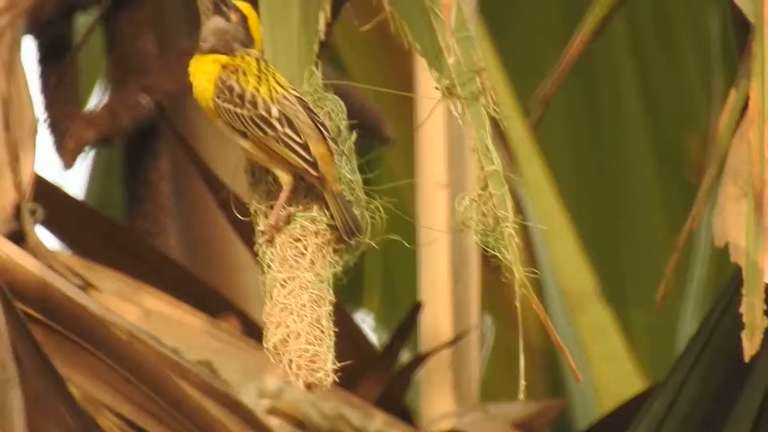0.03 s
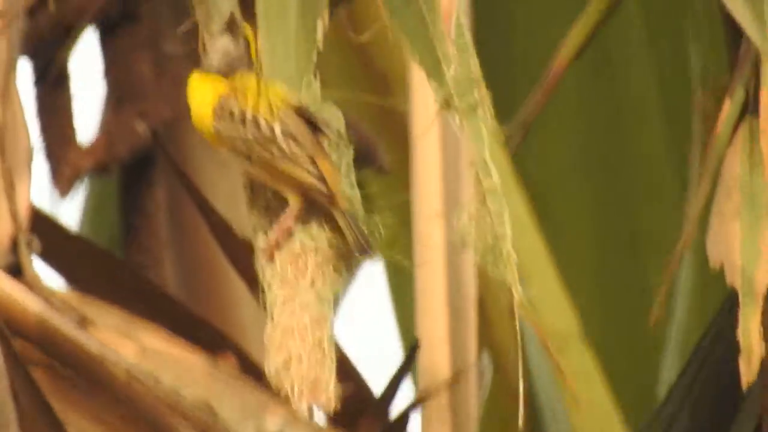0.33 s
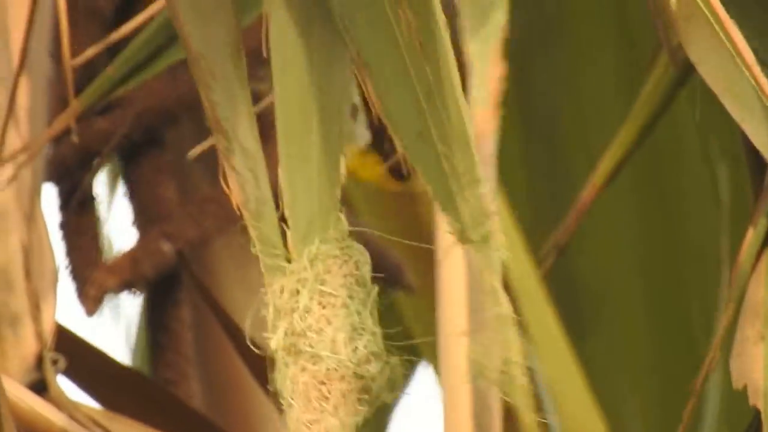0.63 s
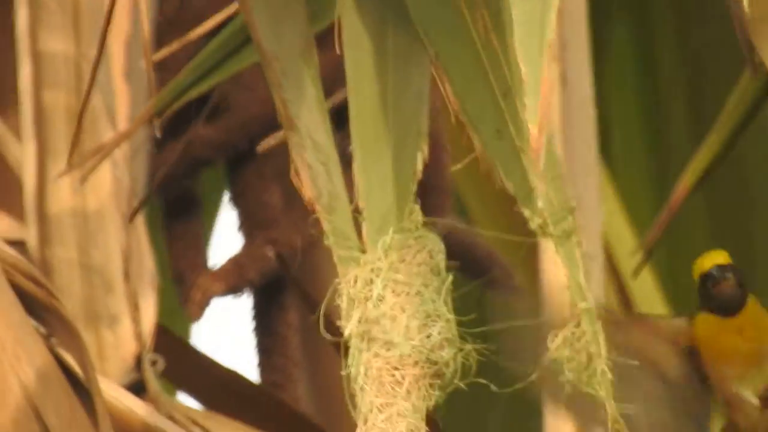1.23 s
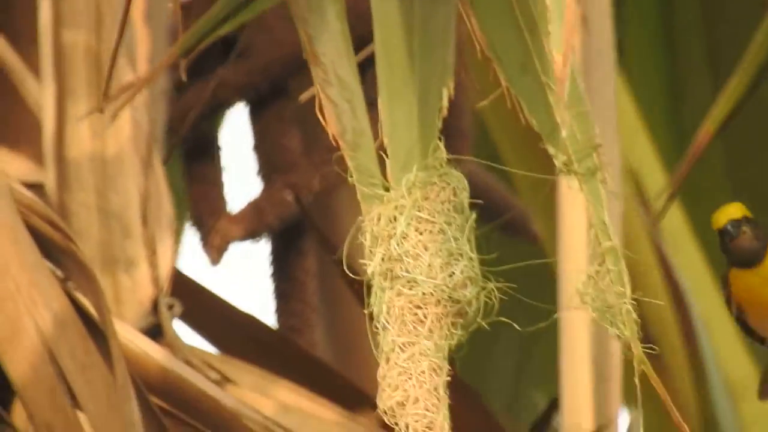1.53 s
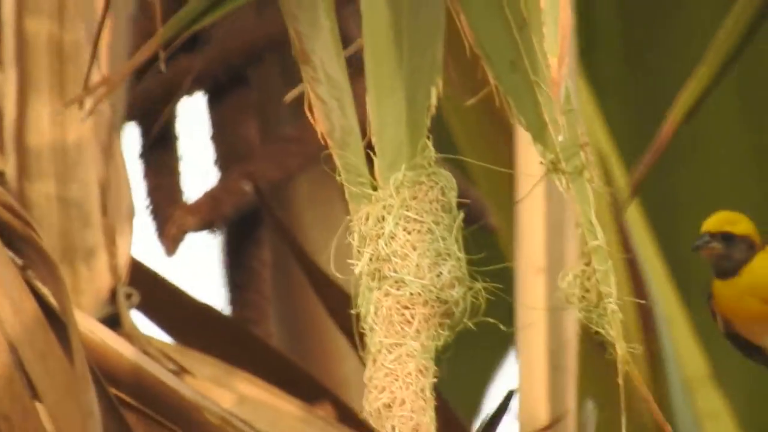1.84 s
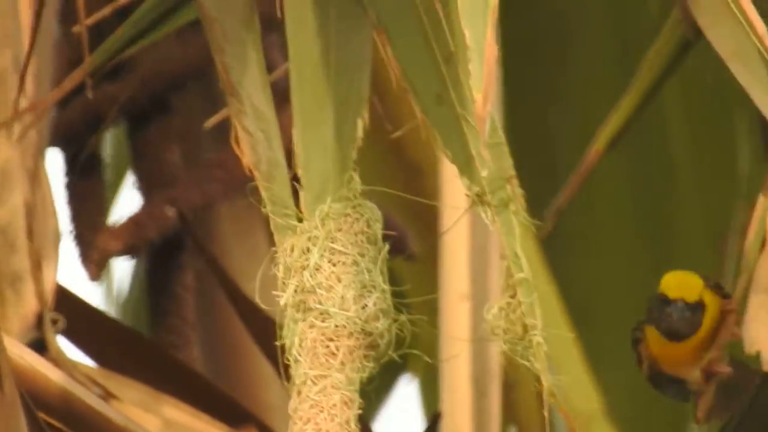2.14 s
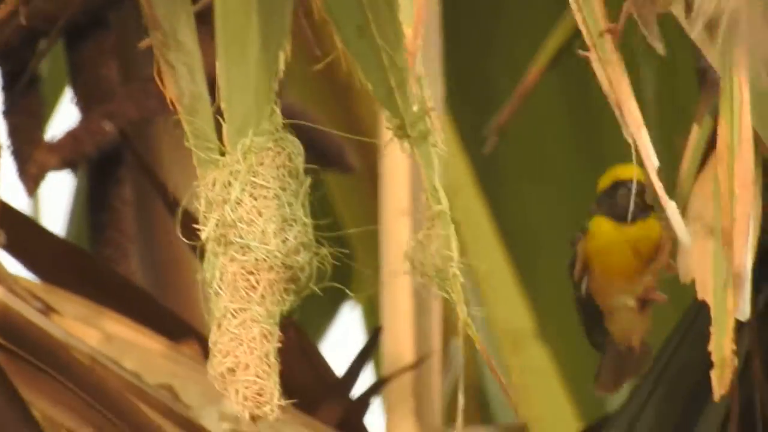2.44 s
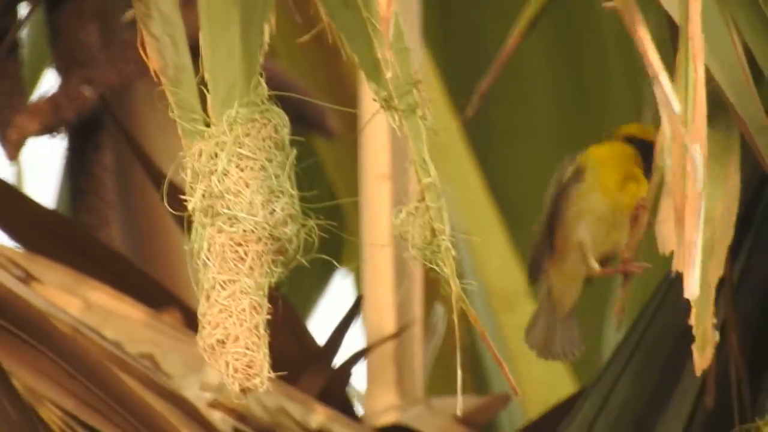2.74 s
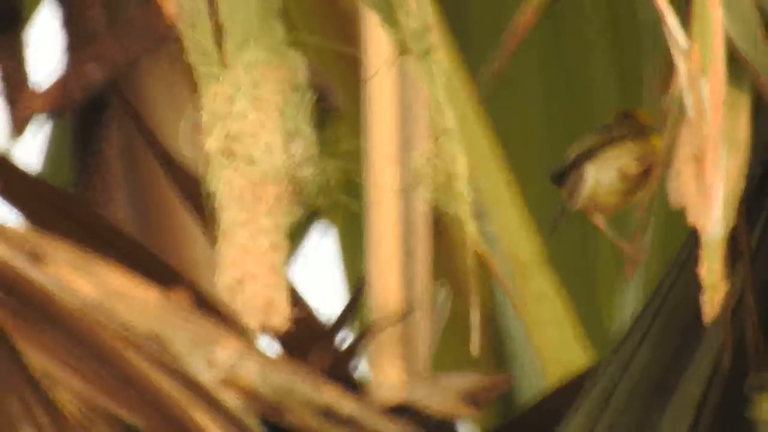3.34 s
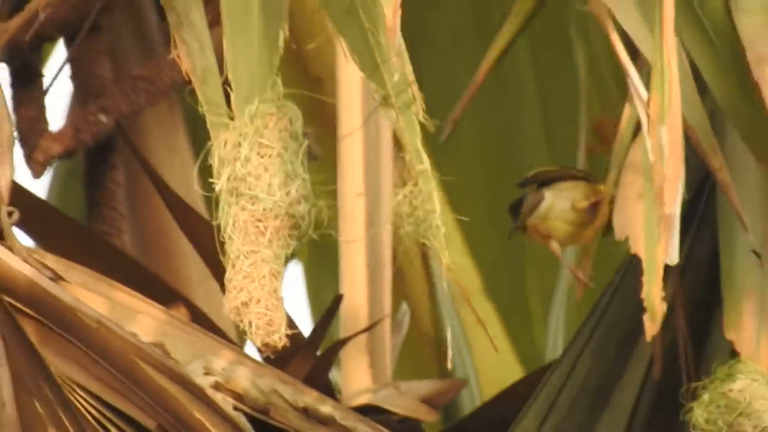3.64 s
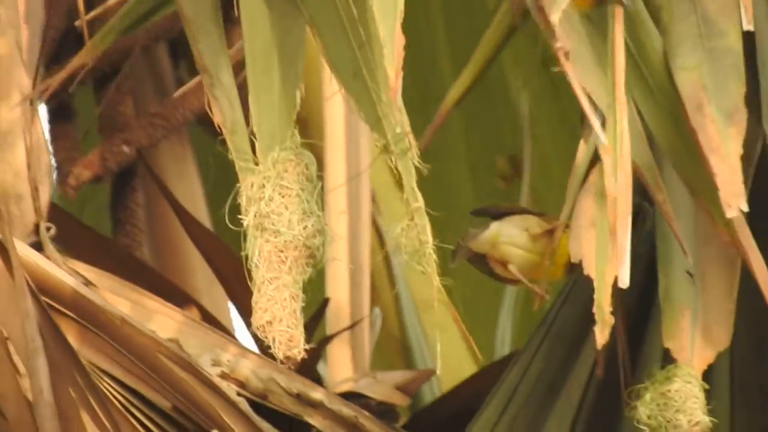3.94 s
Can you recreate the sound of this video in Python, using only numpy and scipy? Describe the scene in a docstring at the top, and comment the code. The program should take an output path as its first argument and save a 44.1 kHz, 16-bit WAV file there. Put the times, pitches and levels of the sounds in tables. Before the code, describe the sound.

Small birds chatter in rapid, high, rasping notes throughout, over a low outdoor rumble and a bright hiss. Clear whistles, sharp chips and a brief trill crowd the first second, with short whistles again around 2 seconds. The camera clicks lightly at about 1.1, 2.1 and 2.3 seconds. Just after 3 seconds it takes a soft thump, and its zoom motor whirs faintly to the end as the hiss builds.

```python
"""Weaver birds chatter in a palm, over a low outdoor rumble and a wide, bright hiss.
Each rasping note is two fast-warbling voices, one from each side of the syrinx. Clear whistles,
sharp chips, a trill and short pips weave through, and stiff fronds scatter every call.
Close by, a hand-held camera clicks; near the end its zoom motor whirs and its body takes a thump."""
import sys
import numpy as np
from scipy import signal
from scipy.fft import rfft, irfft, next_fast_len
from scipy.io import wavfile
from scipy.ndimage import map_coordinates

SR = 44100
rng = np.random.default_rng(int(sys.argv[2]) if len(sys.argv) > 2 else 0)


def pcm_store(signal):
    """Save signal as 16-bit PCM."""
    levels = np.round(np.clip(np.atleast_2d(signal), -1, 1) * 32767)
    wavfile.write(sys.argv[1], SR, levels.astype(np.int16).T)


N = 176400

# The chatter. Each row: start and length in seconds, low and high voice levels in dB, high pitch in Hz.
RASPING_NOTES = [(0.077, 0.091, -31, -30, 5710), (0.175, 0.12, -31.5, -34, 5800),
                 (0.353, 0.1, -31, -31, 5900), (0.44, 0.073, -60, -33.5, 6900),
                 (0.507, 0.099, -27, -28.5, 5704), (0.653, 0.095, -36, -27.5, 6120),
                 (0.8, 0.078, -32, -29, 5390), (0.873, 0.066, -42, -33.5, 5700),
                 (0.968, 0.076, -28.5, -30.5, 5380), (1.021, 0.094, -40.5, -36, 5360),
                 (1.123, 0.094, -35.5, -29, 5400), (1.222, 0.1, -38, -33.5, 5650),
                 (1.289, 0.049, -50, -27.5, 5660), (1.387, 0.086, -45, -28, 5600),
                 (1.541, .1, -41, -31.5, 5260), (1.757, 0.086, -32.5, -34, 5310),
                 (1.933, 0.14, -36.5, -30.5, 5470), (2.072, 0.11, -34.5, -34, 5136),
                 (2.228, 0.095, -37, -31.5, 5250), (2.373, 0.081, -40, -30.5, 5210),
                 (2.445, 0.14, -40.5, -28.5, 5750), (2.611, 0.13, -39.5, -29, 5680),
                 (2.805, 0.11, -36, -28.5, 5490), (2.913, 0.082, -43.5, -44.5, 5000),
                 (3.019, 0.072, -34, -31.5, 5460), (3.082, 0.12, -35, -31.5, 5540),
                 (3.27, 0.096, -37.5, -39.5, 5260), (3.417, 0.11, -39, -36, 5450),
                 (3.624, 0.096, -36.5, -31.5, 4980), (3.797, 0.095, -37, -35.5, 4900),
                 (3.908, 0.085, -48.5, -32.5, 6140)]
# Tone colour of the rasp, the rumble and the hiss. Each row: frequency in Hz, gain in dB.
RASP_EQ = [(1800, -34), (2400, -4), (2800, -7.5), (3200, -1.5), (6800, -1.5), (8000, -12.5), (10000, -24),
           (15500, -52.5)]
RUMBLE_EQ = [(18, -38.5), (76, 2.5), (115, -3), (157, 1.5), (275, -8), (336, -20), (700, -24), (1900, -29),
             (3000, -100)]
HISS_EQ = [(2000, -4.5), (3200, 7.5), (4500, 7.5), (6500, 12), (8000, 0), (12000, -19.5), (15500, -24)]
# Stereo width of the birds, the rumble and the hiss. Each row: frequency in Hz, side gain in dB.
BIRD_WIDTH = [(3500, -10.5), (6000, -5), (8000, -9)]
RUMBLE_WIDTH = [(25, -24), (100, -24.5), (250, -17.5), (500, -8)]
HISS_WIDTH = [(4000, -6), (9000, 0)]
# The hiss dips, then builds. Each row: time in seconds, level in dB.
HISS_FADER = [(1.4, -47.5), (1.7, -51), (2.3, -47.5), (4, -41)]
# One curve per whistle. Each row of a curve: time in seconds, pitch in Hz, level in dB.
WHISTLE_CURVES = [
    [(.17, 4710, -47), (.234, 4740, -20), (.29, 4660, -23), (.34, 4467, -23.5), (.404, 4500, -21.5),
     (.448, 4350, -27)],
    [(.59, 4106, -24), (.606, 4180, -21.5), (.65, 4410, -21), (.656, 4550, -24), (.666, 4593, -21.5),
     (.698, 4460, -24.5), (.708, 4270, -28)],
    [(1.85, 4550, -37), (1.872, 4480, -36.5), (1.906, 4420, -21.5), (1.916, 4290, -31.5),
     (1.935, 4350, -33)],
    [(2.075, 4490, -50), (2.113, 4450, -28), (2.122, 4400, -42)],
]
# Sharp chips. Each row: start in seconds, pitch at mid-arch in Hz, level in dB.
SHARP_CHIPS = [(0.209, 6320, -25), (.377, 6340, -27), (0.521, 6400, -23.5), (.67, 6350, -26),
               (1.296, 5890, -25), (1.543, 6060, -20.5), (2.63, 6360, -23.5), (2.826, 6180, -22.5)]
# Pips that lead into a note. Each row: start and length in seconds, pitch in Hz, level in dB.
LEAD_IN_PIPS = [(0.479, 0.014, 3780, -25.5), (0.503, 0.018, 4025, -24), (0.788, 0.018, 3740, -35.5),
                (0.951, 0.022, 3730, -32.5), (1.114, 0.036, 4030, -32), (1.38, 0.012, 3790, -41),
                (1.724, 0.014, 3690, -36), (2.219, 0.012, 3700, -36), (2.371, 0.024, 3780, -36.5),
                (2.793, 0.037, 3750, -34), (3.988, 0.025, 3716, -31)]
# Slurred chirps. Each row: start and length in seconds, middle pitch in Hz, level in dB,
# fall in octaves a second (negative rises).
SLURRED_CHIRPS = [(3.272, 0.023, 3850, -35, 11), (3.452, 0.02, 4250, -30.5, 21),
                  (3.786, .04, 4004, -30.5, 6), (3.802, 0.011, 4830, -26.5, 34),
                  (3.859, 0.0197, 4590, -29.5, -16.5)]
# Camera clicks. Each row: start in seconds, level in dB.
CAMERA_CLICKS = [(1.118, -38), (2.123, -31.5), (2.342, -30)]
# Tone colour of a click's edge. Each row: frequency in Hz, gain in dB.
CRACK_EQ = [(500, 6), (7000, -5), (12000, -30)]
# The camera body, clicked and thumped. Each row: frequency in Hz, gain in dB, seconds to fall 60 dB.
CLICK_RING = [(476, 5, 0.025), (718.4, 2, 0.016), (1188, -13, 0.088), (2522, 2.5, 0.017),
              (3510, 13, 0.0075)]
THUMP_RING = [(207.5, 2.5, 0.13), (598, -9, 0.053), (796, -12.5, 0.058), (1155, -5, 0.063)]
# Resonances of the lens barrel. Each row: centre and width in Hz, gain in dB.
BARREL_RESONANCES = [(831, 39, 8), (1218, 80, 9.5), (2560, 190, -5), (7200, 130, 0), (8570, 230, -15.5),
                     (13900, 350, -35)]
# The zoom motor's whir and its low hum. Each row: time in seconds, level in dB.
WHIR_FADER = [(3.07, -59), (3.18, -49), (3.27, -43), (3.47, -54), (3.68, -44.5), (3.86, -38.5), (4, -39.5)]
HUM_FADER = [(3.2, -46), (3.8, -56), (3.97, -30.5)]

CALL_WET_DB, CLEAR_WET_DB = -5, -12  # leaf scatter on notes and chirps; on whistles and the trill
OVERTONE_DB = -42  # second harmonic of a clear tone


def amp(db):
    """Decibels to gain."""
    return 10 ** (np.asarray(db) / 20)


def unit(x):
    """Scale to rms 1."""
    return x / np.sqrt(np.mean(x ** 2) + 1e-20)


def filtered(x, response):
    """Shape x with a gain that depends on frequency."""
    n = x.shape[-1]
    size = next_fast_len(n + 8192)
    return irfft(rfft(x, size) * response(np.fft.rfftfreq(size, 1 / SR)), size)[..., :n]


def coloured(x, eq):
    """Run x through an EQ curve of (Hz, dB) points on a log axis."""
    knots_hz, db = np.transpose(eq)
    return filtered(x, lambda hz: amp(np.interp(np.log(hz + 1), np.log(knots_hz), db)))


def wobble(t, rate):
    """A smooth random curve, rate knots per unit of t."""
    return map_coordinates(rng.standard_normal(1024), [t * rate], mode="wrap")


def sine(hz):
    """A sine that follows a pitch curve."""
    return np.sin(2 * np.pi * (np.cumsum(hz) / SR + rng.random()))


def add(track, start, x):
    """Mix x into track at start seconds."""
    i = max(round(start * SR), 0)
    track[..., i:i + x.shape[-1]] += x[..., :max(N - i, 0)]


def stereo(mid_side, width):
    """Left and right from mid and side, with the width curve as EQ on the side."""
    mid, side = mid_side[0], coloured(mid_side[1], width)
    return np.array([mid + side, mid - side])


def syrinx(hz, overtone_db=OVERTONE_DB):
    """A bird's tone with a weaker second harmonic."""
    return np.sqrt(2) * (sine(hz) + amp(overtone_db) * sine(2 * hz))


def warble(t, hz, swing_octaves, rate_hz, drift=.25, stray_octaves=.07, flutter_db=2.5):
    """One voice leaping up and sliding down at an uneven rate, its strength fluttering."""
    uneven_hz = rate_hz * np.exp(drift * wobble(t, rate_hz))
    phase = 2 * np.pi * (np.cumsum(uneven_hz) / SR + rng.random())
    sweep = np.sin(phase + .5 * np.sin(phase))
    pitch = hz * 2 ** (swing_octaves * sweep + stray_octaves * wobble(t, rate_hz))
    throat = 1 / np.sqrt(1 + (pitch / 6760) ** 20)  # the throat shuts out pitches above 6760 Hz
    return unit(syrinx(pitch) * throat * amp(flutter_db * wobble(t, 190.3)))


def fronds(call, wet_db, near_t60_s=.15, grove_t60_s=.32, grove_db=-4):
    """Mid and side of a call with its own leaf scatter and grove tail, at about the same power."""
    t = np.arange(SR // 4) / SR
    near = rng.standard_normal((2, len(t))) * amp(-60 * t / near_t60_s)
    far = rng.standard_normal((2, len(t))) * amp(-60 * t / grove_t60_s)
    echo = amp(wet_db) * (near / np.linalg.norm(near[0]) + amp(grove_db) * far / np.linalg.norm(far[0]))
    echo[0, 0] += 1  # direct sound, dead centre
    return signal.fftconvolve(call[None], echo / np.linalg.norm(echo[0]), axes=1)


def chatter(low_hz=3518, scoop_octaves=.2, rasp_db=-8, beak_db=2.5, swell_db=2.5):
    """Rasping notes: both sides of the syrinx warble at once over a bed of rough noise."""
    out = np.zeros((2, N))
    t = np.arange(SR // 5) / SR
    attack_s, release_s = .02, .035
    for start, length, low_db, high_db, high_hz in RASPING_NOTES:
        position = np.minimum(2 * t / length - 1, 1)  # -1 at the start, +1 at the end
        scooped_hz = low_hz * 2 ** (scoop_octaves * position ** 2)
        low = amp(low_db) * warble(t, scooped_hz, swing_octaves=.1635, rate_hz=100)
        high = amp(high_db) * warble(t, high_hz, swing_octaves=.2545, rate_hz=90)
        rasp = unit(coloured(rng.standard_normal(len(t)), RASP_EQ) * amp(2.3 * wobble(t, 264)))
        note = low + high + amp(rasp_db) * np.hypot(amp(low_db), amp(high_db)) * rasp
        # fresh beak resonances for every note, on a 450 Hz grid
        note = filtered(note, lambda hz: unit(amp(beak_db * wobble(hz, 1 / 450))))
        swell = amp(swell_db * (.3059 - position ** 2))
        attack = np.clip(t / attack_s, 0, 1)
        release = np.clip((length - t) / release_s + .5, 0, 1)
        envelope = swell * np.sin(np.pi / 2 * attack * release)
        add(out, start, fronds(note * envelope, CALL_WET_DB))
    return out


def outdoor_rumble(level_db=-40.5):
    """A narrow bed of low noise, gently wavering."""
    t = np.arange(N) / SR
    noise = unit(coloured(rng.standard_normal((2, N)), RUMBLE_EQ))
    return amp(level_db + wobble(t, 8.31)) * stereo(noise, RUMBLE_WIDTH)


def background_hiss():
    """A wide, bright hiss that dips, then builds."""
    t = np.arange(N) / SR
    noise = unit(coloured(rng.standard_normal((2, N)), HISS_EQ))
    level_db = np.interp(t, *np.transpose(HISS_FADER)) + wobble(t, 8.5)
    return amp(level_db) * stereo(noise, HISS_WIDTH)


def whistles(pitch_waver=.007, waver_db=2.2):
    """Slow, clear glides of the syrinx, a little unsteady in pitch and level."""
    out = np.zeros((2, N))
    for curve in WHISTLE_CURVES:
        times, hz, db = np.transpose(curve)
        t = np.arange(times[0], times[-1], 1 / SR)
        tone = syrinx(np.interp(t, times, hz) * (1 + pitch_waver * wobble(t, 200)))
        level = amp(np.interp(t, times, db) + waver_db * wobble(t, 120))
        add(out, times[0], fronds(tone * level * signal.windows.tukey(len(t), .05), CLEAR_WET_DB))
    return out


def chirp(length, hz, arch_octaves=.08, fall_octaves_per_s=5, overtone_db=OVERTONE_DB):
    """A brief tone whose pitch arches and slides, made scratchy by fast jitter."""
    t = np.arange(0, length, 1 / SR)
    position = 2 * t / length - 1
    scratch = .035 * wobble(t, 770)
    octaves = -arch_octaves * position ** 2 - fall_octaves_per_s * (t - length / 2) + scratch
    tone = syrinx(hz * 2 ** octaves, overtone_db)
    envelope = np.sqrt(1 - position ** 2) * amp(2.3 * wobble(t, 400))
    return fronds(tone * envelope, CALL_WET_DB)


def short_calls():
    """Three kinds of chirp: sharp chips, soft lead-in pips and slurs."""
    out = np.zeros((2, N))
    for start, hz, db in SHARP_CHIPS:
        add(out, start, amp(db) * chirp(length=.0067, hz=hz, arch_octaves=.285))
    for start, length, hz, db in LEAD_IN_PIPS:
        add(out, start, amp(db) * chirp(length, hz, overtone_db=-17))
    for start, length, hz, db, fall in SLURRED_CHIRPS:
        add(out, start, amp(db) * chirp(length, hz, fall_octaves_per_s=fall))
    return out


def trill(start_s=.238, end_s=.345, level_db=-22):
    """A second bird buzzes across the first whistle with one tight, fast warble."""
    out = np.zeros((2, N))
    t = np.arange(0, end_s - start_s, 1 / SR)
    buzz = warble(t, 4860, swing_octaves=.12, rate_hz=100, drift=.091, stray_octaves=.0095,
                  flutter_db=1.5)
    add(out, start_s, fronds(amp(level_db) * buzz * signal.windows.tukey(len(t), .3), CLEAR_WET_DB))
    return out


def body_ring(modes, rise_s):
    """A blow on the camera body: modes that swell and die away."""
    t = np.arange(SR // 4) / SR
    ring = sum(amp(db - 60 * t / t60) * np.sin(2 * np.pi * hz * (t + rng.random()))
               for hz, db, t60 in modes)
    return ring * np.clip(t / rise_s, 0, 1) ** 2


def camera_clicks(rise_s=.0005, crack_db=1, crack_t60_s=.023):
    """Each click: a crack of noise on top of the body's short ring."""
    out = np.zeros(N)
    t = np.arange(N) / SR
    envelope = amp(crack_db - 60 * t / crack_t60_s) * np.minimum(t / rise_s, 1)
    for start, db in CAMERA_CLICKS:
        crack = unit(coloured(rng.standard_normal(N), CRACK_EQ)) * envelope
        add(out, start, amp(db) * crack)
        add(out, start, amp(db) * body_ring(CLICK_RING, rise_s))
    return out


def resonant_noise(peaks):
    """Noise of rms 1 in steep resonances, each a centre in Hz, a width in Hz and a gain in dB."""
    def response(hz):
        return sum(amp(db) / (1 + np.abs(2 * (hz - centre) / width) ** 1.42)
                   for centre, width, db in peaks)
    return unit(filtered(rng.standard_normal(N), response))


def zoom_motor(speed_waver=.025, flutter_db=3, hum_hz=198.7, hum_width_hz=20):
    """The motor whirs through the lens barrel at an unsteady speed, over its own low hum."""
    t = np.arange(N) / SR
    turning = np.cumsum(1 + speed_waver * wobble(t, 10))
    whir = map_coordinates(resonant_noise(BARREL_RESONANCES), [turning], mode="mirror")  # varispeed
    whir_db = np.interp(t, *np.transpose(WHIR_FADER), left=-120) + flutter_db * wobble(t, 45)
    hum = resonant_noise([(hum_hz, hum_width_hz, 0)])
    hum_db = np.interp(t, *np.transpose(HUM_FADER), left=-120)
    return amp(whir_db) * whir + amp(hum_db) * hum


def camera_thump(start_s=3.143, level_db=-13.5):
    """One soft-edged knock rings the body's low modes."""
    out = np.zeros(N)
    add(out, start_s, amp(level_db) * body_ring(THUMP_RING, rise_s=.01))
    return out


def scene():
    """Birds, rumble and hiss in stereo, camera noises in the centre."""
    birds = stereo(chatter() + whistles() + short_calls() + trill(), BIRD_WIDTH)
    bed = outdoor_rumble() + background_hiss()
    return birds + bed + camera_clicks() + zoom_motor() + camera_thump()


def record(dry):
    """A quick fade-in after a short silence; the deepest bass and the very top are cut."""
    silence_s, fade_s = .082, .01
    low_cut_hz, top_hz = 34, 15750
    fade_in = np.clip((np.arange(N) / SR - silence_s) / fade_s, 0, 1)
    return filtered(dry * fade_in, lambda hz: (hz < top_hz) * hz ** 2 / np.hypot(hz ** 2, low_cut_hz ** 2))


dry = scene()
out = record(dry)
pcm_store(out)
```